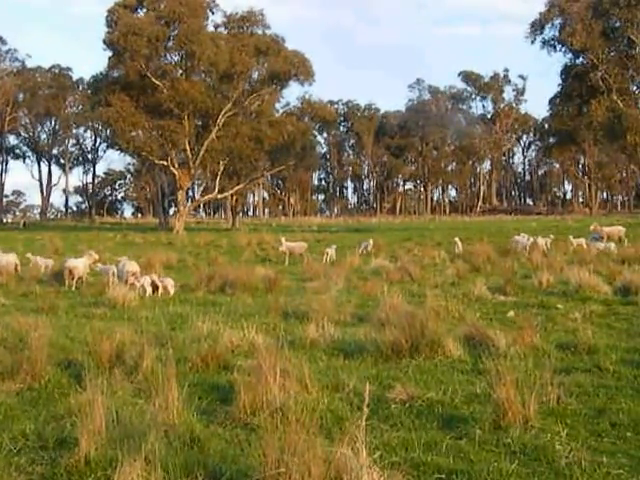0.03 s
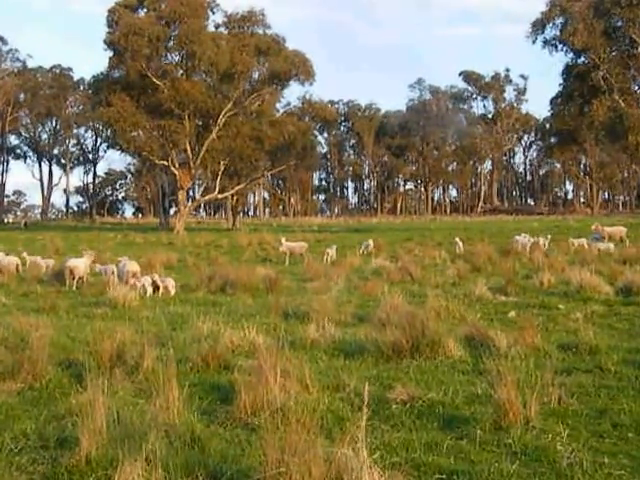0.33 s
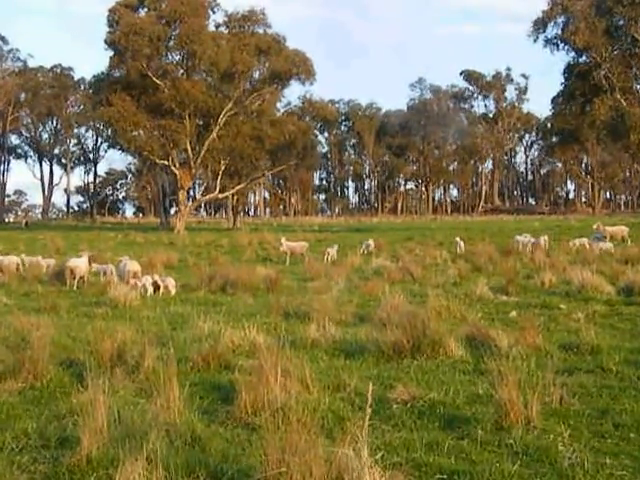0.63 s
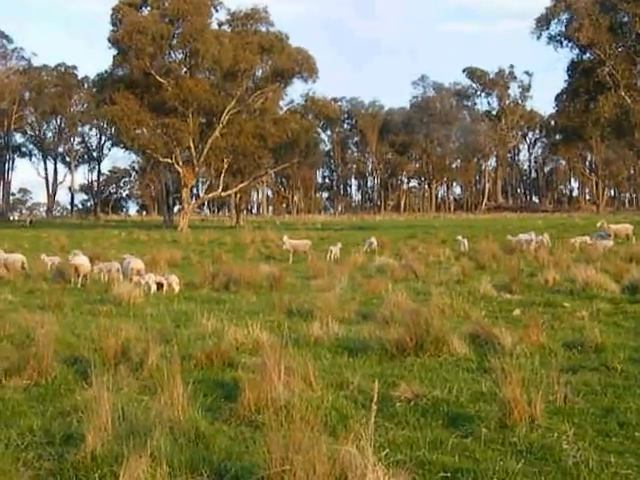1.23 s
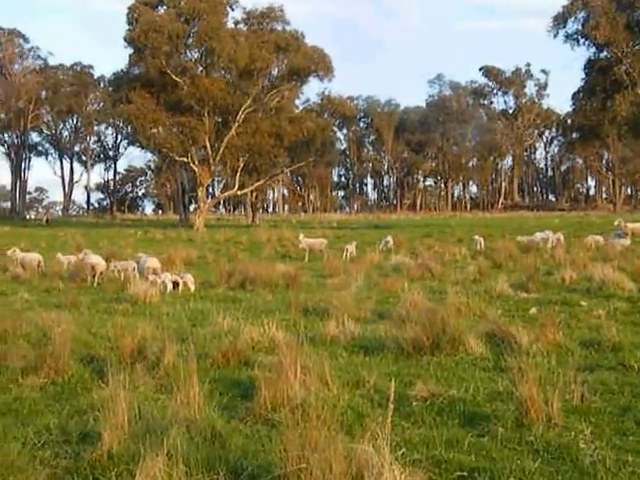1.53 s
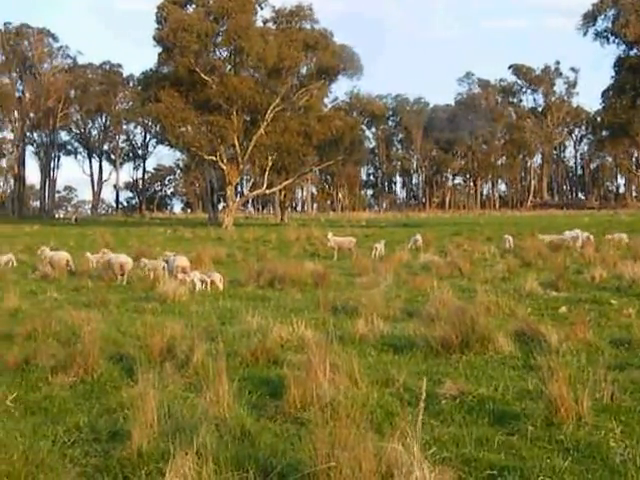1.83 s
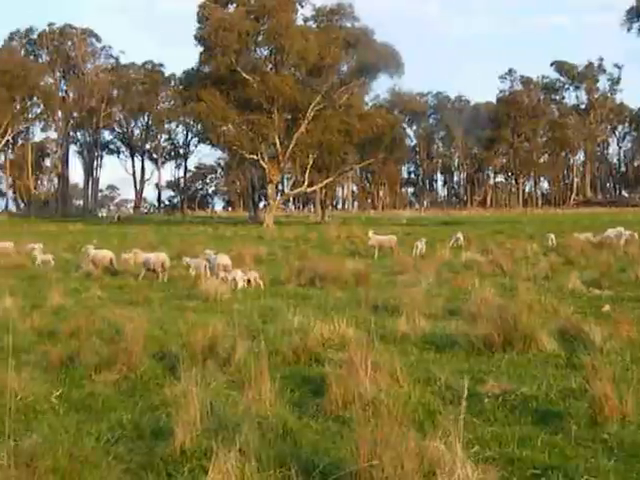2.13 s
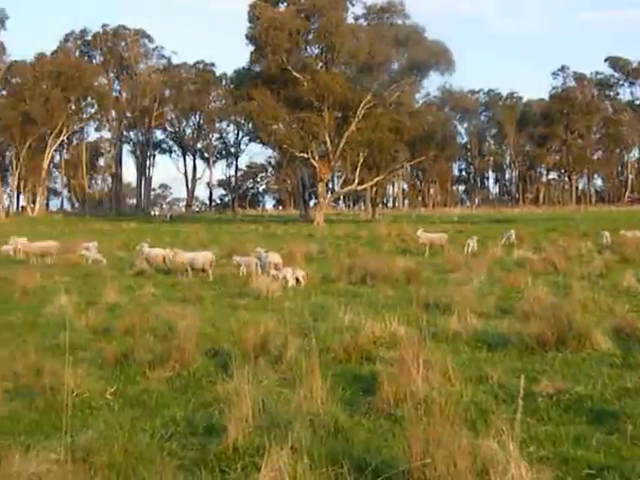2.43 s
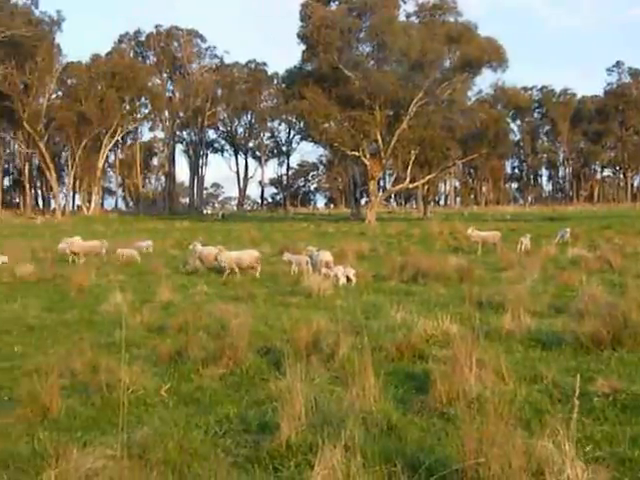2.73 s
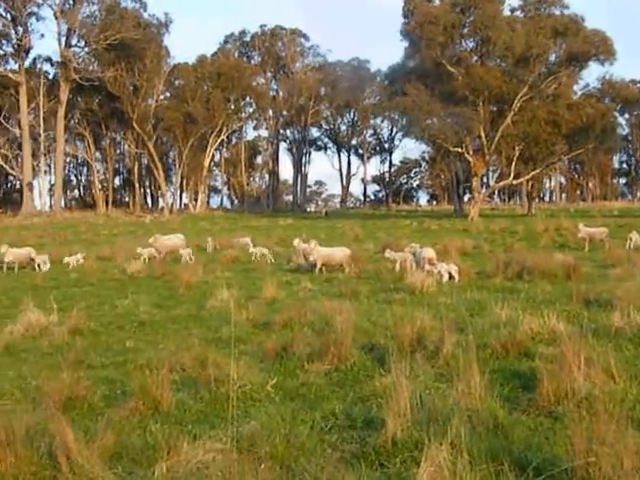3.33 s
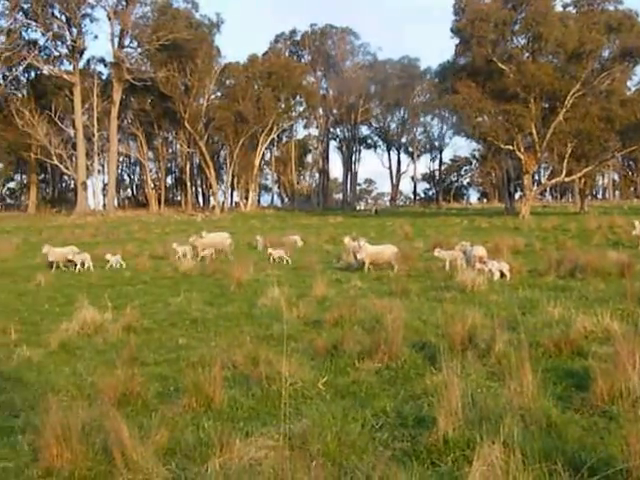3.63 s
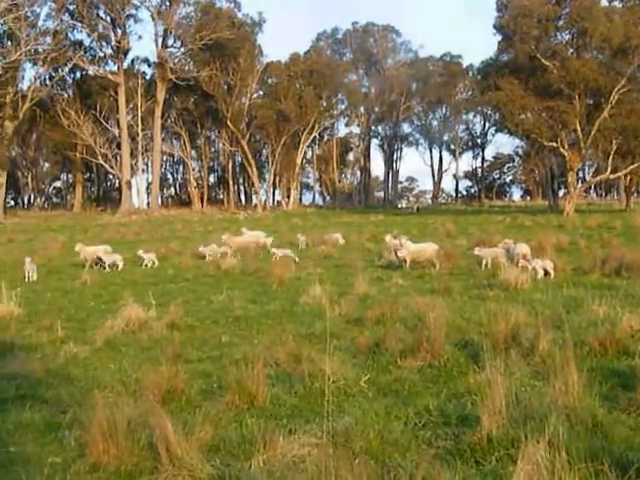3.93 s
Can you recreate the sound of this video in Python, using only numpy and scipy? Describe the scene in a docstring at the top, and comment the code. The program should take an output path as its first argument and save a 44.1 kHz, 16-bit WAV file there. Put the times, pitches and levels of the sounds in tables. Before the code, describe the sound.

A lamb gives a clear held bleat, then a shaky one as something creaks close by. A faint, far bleat answers across the field, while steady wind and a low hum continue and gusts bump the microphone.

```python
"""Lambs bleat in an open paddock: one long clear call, one quavering call, then a distant answer.
Near calls are vocal-fold pulses and breath shaped by the throat; far ones keep three harmonics.
During the quaver something creaks close by, each slip ringing briefly, over a faint low moan.
Wind hisses over the field and gusts across the microphone, above a low beating hum."""
import sys
import numpy as np
from scipy import signal
from scipy.fft import rfft, irfft
from scipy.io import wavfile
from scipy.ndimage import uniform_filter1d

SR = 44100
rng = np.random.default_rng(int(sys.argv[2]) if len(sys.argv) > 2 else 0)


def digitize_waveform(pressure):
    """Quantize a signal to 16-bit integers and store it at the path in sys.argv[1].

    Rows of a 2-D input are taken as channels; values are limited to [-1, 1].
    """
    field = np.atleast_2d(pressure).T
    bounded = np.clip(field, -1, 1)
    quanta = np.round(bounded * 32767).astype(np.int16)
    wavfile.write(sys.argv[1], SR, quanta)


N = 176400
T = np.arange(N) / SR


def amp(db):
    """Decibels to gain."""
    return 10 ** (np.asarray(db) / 20)


def unit(x):
    """Scale to rms 1."""
    return x / np.sqrt(np.mean(x ** 2) + 1e-20)


def curve(rows, column=1):
    """One table column, interpolated over time."""
    rows = np.array(rows, float)
    return np.interp(T, rows[:, 0], rows[:, column])


def gate(rows):
    """Open from first row to last, 16 ms ramps."""
    return np.clip(np.minimum(T - rows[0][0], rows[-1][0] - T) / .016 + .5, 0, 1)


def wander(hz):
    """Random drift, rms 1, rolling off above hz."""
    f = np.fft.rfftfreq(N, 1 / SR)
    return unit(irfft(rfft(rng.standard_normal(N)) / (1 + (f / hz) ** 4), N))


def colour(x, spectrum):
    """Minimum-phase filter from (Hz, dB) points."""
    f, db = np.transpose(spectrum)
    hz = abs(np.fft.fftfreq(N, 1 / SR))
    log_gain = np.log(amp(np.interp(np.log(hz + 1), np.log(np.sort(f)), db)))
    taps = np.fft.ifft(np.exp(np.conj(signal.hilbert(log_gain)))).real[:8192]
    return signal.fftconvolve(x, taps)[:N]


def noise(spectrum):
    """Coloured noise, rms 1."""
    return unit(colour(rng.standard_normal(N), spectrum))


def add(mix, start_s, sound):
    """Mix a sound in at start_s."""
    part = mix[max(round(start_s * SR), 0):][:len(sound)]
    part += sound[:len(part)]


def hum():
    """Two low tones beat against each other."""
    # Each row: frequency in Hz, rms level in dB before the swell.
    partials = [(55.6, -45.5), (64.7, -46.5)]
    # Each row: time in seconds, gain in dB.
    swell = [(0, 0), (.8, 5), (1.6, 0), (2.2, -3), (3.2, -0.5), (4, -0.5)]
    tones = sum(amp(db) * np.sin(2 * np.pi * (hz * T + rng.random()) + .36 * wander(5.2))
                for hz, db in partials)
    return np.sqrt(2) * tones * amp(curve(swell))


def wind():
    """Steady air, with gusts and low buffets across the microphone."""
    # Noise spectra. Each row: frequency in Hz, relative level in dB.
    air_spectrum = [(8, -2), (16, 6), (30, -2), (50, -8), (85, -10), (188, -16), (353, -20.5), (740, -22),
                    (1240, -22.5), (1600, -24), (2800, -25.5), (4400, -26), (5500, -31.5)]
    soft_spectrum = [(60, -10.5), (130, -7.5), (220, -3.5), (340, -1), (480, -9.5), (650, -15.5),
                     (1000, -9), (1300, -28), (2000, -20.5), (4000, -27.5), (5500, -29)]
    hard_spectrum = [(60, -8.5), (180, -14), (320, 4.5), (430, -3), (620, -15.5), (900, -2.5),
                     (1120, -10.5), (1460, -29), (2200, -25), (3090, -16.5), (3700, -16.5), (4800, -23.5),
                     (5500, -23)]
    # Gust envelopes and buffet peaks. Each row: time in seconds, level in dB.
    soft_level = [(0, -90.5), (.15, -56.5), (.3, -44), (.55, -42), (.8, -46), (1.0, -68), (1.18, -57),
                  (1.3, -47.5), (1.42, -50.5), (1.65, -50), (1.82, -66), (1.95, -69)]
    hard_level = [(3.45, -78), (3.6, -52.5), (3.699, -42.5), (3.92, -39.5), (4.0, -41)]
    buffet_peaks = [(.25, -30.5), (.8, -30.5), (.92, -32), (.97, -29.5), (1.28, -41), (2.08, -36),
                    (3.72, -28)]
    buffet_hz, buffet_s = 19, .035
    air = noise(air_spectrum) * amp(-43.5 + .6 * wander(7.7))
    gusts = sum(noise(spectrum) * amp(curve(level) + 1.4 * wander(23))
                for spectrum, level in [(soft_spectrum, soft_level), (hard_spectrum, hard_level)])
    buffets = sum(amp(db) * np.exp(-((T - s) / buffet_s) ** 2) * np.cos(2 * np.pi * buffet_hz * (T - s))
                  for s, db in buffet_peaks)
    return air + gusts + buffets


def moans():
    """Faint unsteady tones: four under the quaver, one in the last gust."""
    # Tone tracks. Each row: time in seconds, frequency in Hz, level in dB.
    low = [(1.2, 130, -62), (1.26, 128, -51), (1.45, 135, -61), (1.58, 141.9, -50.5), (1.7, 148.6, -56),
           (1.85, 146, -67)]
    middle = [(1.24, 411.6, -56.5), (1.36, 400.6, -45), (1.42, 370, -57), (1.5, 335, -49), (1.6, 324, -61),
              (1.72, 312, -73), (1.85, 302, -67)]
    upper = [(1.38, 490, -54), (1.46, 460, -56), (1.6, 428, -56), (1.721, 405.5, -53.5),
             (1.819, 382.4, -53), (1.87, 374, -70.5)]
    top = [(1.4, 660, -64.5), (1.55, 610, -57.5), (1.68, 625, -57), (1.78, 590, -56), (1.87, 570, -62)]
    gust_tone = [(3.6, 300, -64), (3.68, 335, -52), (3.8, 315, -50), (3.9, 318, -53), (3.96, 275, -52),
                 (4.0, 380, -47)]
    out = np.zeros(N)
    for track in (low, middle, upper, top, gust_tone):
        phase = 2 * np.pi * np.cumsum(curve(track) * (1 + .023 * wander(50))) / SR
        out += np.sqrt(2) * np.sin(phase) * amp(curve(track, 2) + 2.6 * wander(25)) * gate(track)
    return out


def creak():
    """Irregular slips ring briefly; small ones fill the gaps between the loud ones."""
    # Loud slips. Each row: start in seconds, relative level in dB, ring frequency in Hz.
    slips = [(1.3596, -28, 2770), (1.3751, -23, 2050), (1.4146, -30, 2860), (1.428, -28.5, 2520),
             (1.4659, -23, 2280), (1.477, -29, 2280), (1.4913, -20.5, 2250), (1.5051, -17.5, 2570),
             (1.5144, -25.5, 2950), (1.5239, -22.5, 2920), (1.5351, -22, 2420), (1.546, -24, 2090),
             (1.5671, -22, 2800), (1.5747, -21, 2420), (1.587, -21.5, 2170), (1.6026, -26, 1930),
             (1.6173, -21.5, 2200), (1.6476, -20, 2550), (1.6542, -19, 2350), (1.6605, -20.5, 2320),
             (1.667, -22, 2190), (1.6731, -25, 2060), (1.6854, -22, 2050), (1.699, -23.5, 2712),
             (1.7088, -21.5, 3000), (1.7187, -23, 2850), (1.729, -23.5, 2730), (1.7381, -25, 2250),
             (1.7443, -23.5, 2230), (1.7507, -18, 2350), (1.7583, -28, 2350), (1.8104, -23, 2323),
             (1.8236, -25.5, 2100), (1.8293, -20.5, 2330)]
    # Slip modes. Each row: multiple of the ring frequency, gain in dB, T60 in seconds.
    slip_modes = [(1, -1.5, 0.017), (1.17, -8.5, 0.0082), (.86, -10.5, 0.0053)]
    # Body modes. Each row: frequency in Hz, gain in dB, T60 in seconds.
    body_modes = [(1540, -11, .028), (2270, -16, .02), (3250, -18, .01)]
    gap_s, band_hz = .0071, [1460, 3260]
    out, t = np.zeros(N), np.arange(1200) / SR
    slip_s, _, ring_hz = np.transpose(slips)
    grid_s = np.arange(slip_s[0], slip_s[-1] + .02, gap_s)
    scatter = rng.standard_normal((200, 2))
    small_slips = [(s + .0025 * late, -31 + 1.9 * louder, np.interp(s, slip_s, ring_hz))
                   for s, (late, louder) in zip(grid_s, scatter) if abs(slip_s - s).min() > .005]
    for s, db, hz in list(slips) + small_slips:
        modes = [(hz * ratio, mode_db, t60) for ratio, mode_db, t60 in slip_modes] + body_modes
        ring = sum(amp(mode_db - 60 * t / t60) * np.sin(2 * np.pi * f * t) for f, mode_db, t60 in modes)
        add(out, s, amp(db - 2.5) * ring)
    return signal.sosfilt(signal.butter(3, band_hz, "band", fs=SR, output="sos"), out)


def far_bleats():
    """Two calls cut to three harmonics by distance, fluttering in wind; the answer stutters at first."""
    # Calls. Each row: time in seconds, pitch in Hz, levels of harmonics 2 and 3 in dB.
    answer = [(2.44, 465, -61, -75), (2.485, 485, -52.5, -63), (2.54, 500, -60, -62),
              (2.616, 544, -48, -64), (2.716, 557, -54.5, -54), (2.79, 564, -64, -53.5),
              (2.86, 562, -55.5, -53), (2.93, 560, -55.5, -53.5), (2.99, 562, -56.5, -54.5),
              (3.04, 566, -65, -52.5), (3.1, 570, -50.5, -56), (3.322, 582, -47, -58),
              (3.674, 583.2, -45, -54.5), (3.804, 574, -48.5, -55), (3.866, 520, -43.5, -67),
              (3.92, 445, -68, -63)]
    faint_call = [(1.85, 607, -53, -63), (1.95, 622, -69, -67), (2.12, 645, -61, -71),
                  (2.25, 630, -61, -67), (2.38, 617, -68, -81)]
    stutter_hz, stutter_db = 15, 8
    out = np.zeros(N)
    for call, hold_s in [(answer, 2.6), (faint_call, 0)]:
        pitch_hz = uniform_filter1d(curve(call), 1500) * (1 + .0016 * wander(32))
        phase = 2 * np.pi * np.cumsum(pitch_hz) / SR
        dip_db = stutter_db * (T < hold_s) * np.sin(np.pi * stutter_hz * (T - hold_s)) ** 2
        harmonics_db = [curve(call, 2) - 18, curve(call, 2), curve(call, 3)]
        voice = sum(amp(db - dip_db + 1.4 * wander(16)) * np.sin(k * phase)
                    for k, db in enumerate(harmonics_db, 1))
        out += np.sqrt(2) * gate(call) * voice
    return out


def vocal_folds(hz, jitter, breath):
    """Jittered pulses of 17 harmonics, with a puff of air each cycle."""
    cycles = np.cumsum(hz * (1 + jitter * wander(70))) / SR
    pulses = sum(np.cos(2 * np.pi * k * cycles) for k in range(1, 18))
    puffs = (.4 + np.exp(-(cycles % 1) / .36)) * rng.standard_normal(N)
    return unit(pulses) + breath * unit(puffs)


def quavering_bleat():
    """Pitch and strength jump together about 14 times a second."""
    # Each row: time in seconds, pitch in Hz, level in dB.
    throbs = [(1.155, 389, -48.5), (1.225, 392.5, -42.5), (1.293, 414, -34), (1.361, 432.3, -31.5),
              (1.429, 428.3, -34.5), (1.497, 414.5, -35.5), (1.568, 420, -35), (1.647, 394.6, -38),
              (1.728, 389.4, -36.5), (1.805, 390, -36)]
    # Throat response. Each row: frequency in Hz, gain in dB.
    throat = [(400, -22.5), (800, -31), (1270, -2.5), (1700, -10), (2120, -5), (2550, -10), (3000, 6),
              (3400, -12.5), (3800, -26), (4250, -6.5), (5100, 2.5), (5450, 2), (5750, -6)]
    surge_s, lift_s, pitch_dip = .0096, .024, .1
    times_s = [row[0] for row in throbs]
    surges = sum(np.exp(-((T - s) / surge_s) ** 2) for s in times_s)
    lift = sum(np.exp(-((T - s) / lift_s) ** 2) for s in times_s)
    pitch_hz = curve(throbs) * (1 - pitch_dip * (1 - lift))
    voice = unit(colour(vocal_folds(pitch_hz, jitter=.008, breath=.4), throat))
    sustain = amp(-15.5 - 15 * (T - times_s[2])) * gate(throbs)
    return voice * amp(curve(throbs, 2)) * (surges + sustain)


def long_bleat():
    """A short catch of the voice, then a clear held call, hoarser at its edges."""
    # Each row: time in seconds, pitch in Hz.
    pitch = [(.055, 305), (.082, 331), (.11, 354), (.132, 368), (.2, 388), (.226, 398), (.256, 404.2),
             (.336, 411.6), (.378, 408.6), (.42, 411.4), (.524, 407.9), (.578, 410.4), (.712, 408.7),
             (.87, 414), (1.026, 407), (1.06, 399), (1.082, 386), (1.125, 325)]
    # Call envelope and treble lift. Each row: time in seconds, gain in dB.
    level = [(.055, -42.5), (.075, -34.5), (.125, -33), (.22, -35), (.28, -32.5), (.41, -32.5), (.7, -34),
             (.86, -32.5), (1.02, -35), (1.07, -34), (1.105, -41.5), (1.125, -47)]
    treble_lift = [(.06, -1), (.25, 1), (.4, 0), (.53, 1.5), (.62, 1.5), (.72, 0.5), (.82, 0.5), (.95, 0.5),
                   (1.1, -0.5)]
    # Each row: time in seconds, mouth shape from 0 (light call) to 1 (fully held).
    mouth = [(.06, 0.15), (.17, 0.021), (.28, 1), (.4, 1), (.68, 0.92), (.8, 0.84), (.95, 0.74),
             (1.08, 0.28)]
    # Throat at the edges, throat held, air rushing through it. Each row: frequency in Hz, gain in dB.
    throat_edge = [(350, -39.5), (720, -15), (1080, -1), (1430, 2), (1850, -5), (2400, -16), (2800, -7),
                   (3200, 5), (3600, -4.5), (4000, 0), (4400, -19), (4780, -2), (5400, -34)]
    throat_held = [(410, -33.5), (820, -11.5), (1230, 3.5), (1640, -3.5), (2050, -5.5), (2460, -19),
                   (2870, -4.5), (3280, -12.5), (3690, -5), (4100, -17.5), (4500, -17), (4920, -14.5),
                   (5400, -31)]
    rasp_spectrum = [(700, -32), (1250, -7), (1550, -4), (1720, -21.5), (1950, -7), (2200, -21.5),
                     (2700, -16.5), (3000, 4.5), (3500, -0.5), (4000, 1.5), (4300, -16.5), (4850, -8.5),
                     (5400, -17)]
    # Each row: time in seconds, pitch in Hz, level in dB.
    catch_track = [(0, 381.5, -56), (.022, 357, -37), (.04, 362, -45), (.06, 320, -47)]
    treble_hz, rasp_db = 2800, -24
    held = curve(mouth)
    pitch_hz = uniform_filter1d(curve(pitch), 700) * (1 + .0022 * wander(18))
    drive = vocal_folds(pitch_hz, jitter=.0012, breath=.062 + .11 * (1 - held))
    voice = held * unit(colour(drive, throat_held)) + (1 - held) * unit(colour(drive, throat_edge))
    voice /= np.sqrt(abs(uniform_filter1d(voice ** 2, 1500)) + 1e-9)  # flatten short-term rms
    treble = signal.sosfiltfilt(signal.butter(4, treble_hz, "high", fs=SR, output="sos"), voice)
    voice += treble * (amp(curve(treble_lift) + 1.1 * wander(29)) - 1)
    rasp = amp(rasp_db) * noise(rasp_spectrum)
    call = (voice * amp(.44 * wander(25)) + rasp) * amp(curve(level)) * gate(level)
    catch_drive = vocal_folds(curve(catch_track), jitter=.024, breath=.87)
    catch = unit(colour(catch_drive, throat_edge)) * amp(curve(catch_track, 2)) * gate(catch_track)
    return call + catch


def field_echo(x):
    """Add weak, short scatter from ground and trees."""
    echo_db, t60_s = -16, .22
    t = np.arange(SR // 2) / SR
    tail = rng.standard_normal(len(t)) * amp(-60 * t / t60_s) * (t > .006)
    return x + amp(echo_db) * signal.fftconvolve(x, tail / np.linalg.norm(tail))[:N]


def scene():
    """Near bleats and creak with echo, over far bleats, moans, wind and hum; mono."""
    near = long_bleat() + quavering_bleat() + creak()
    faint = far_bleats() + moans()
    return (field_echo(near) + faint + wind() + hum())[None]


def record(dry):
    """Keeping one sample in four mirrors the top of the band upward; filters pass a little of it."""
    def low_pass(x, hz):
        return signal.oaconvolve(x, signal.firwin(301, hz, window=("kaiser", 9), fs=SR), "same")
    # Output filter. Each row: frequency in Hz, gain in dB.
    rolloff = [(20, 0), (4500, 0), (5000, 0.5), (5500, -0.5), (6100, -12), (6530, -25), (6940, -38),
               (7350, -62.5), (8000, -92)]
    step, input_edge_hz, output_edge_hz = 4, 5650, 7250
    sampled = low_pass(dry[0], input_edge_hz) * (np.arange(N) % step == 0) * step
    return low_pass(colour(sampled, rolloff), output_edge_hz)[None]


dry = scene()
out = record(dry)
digitize_waveform(out)
```